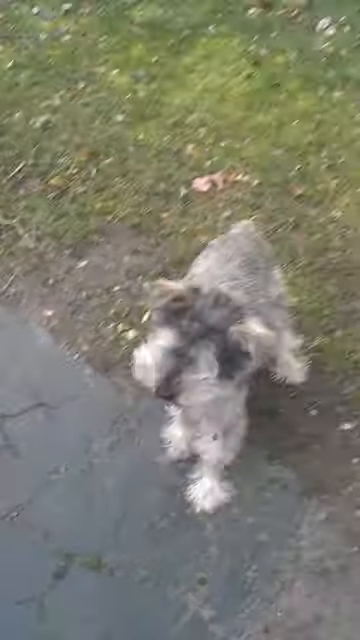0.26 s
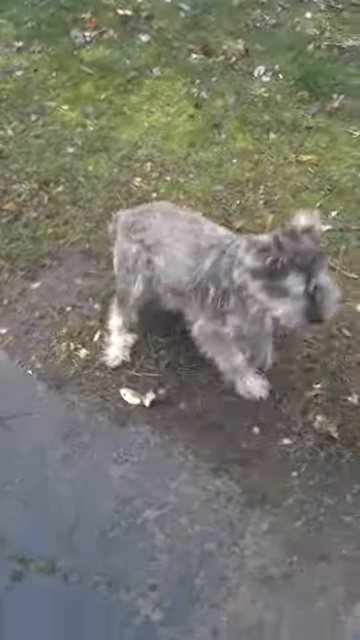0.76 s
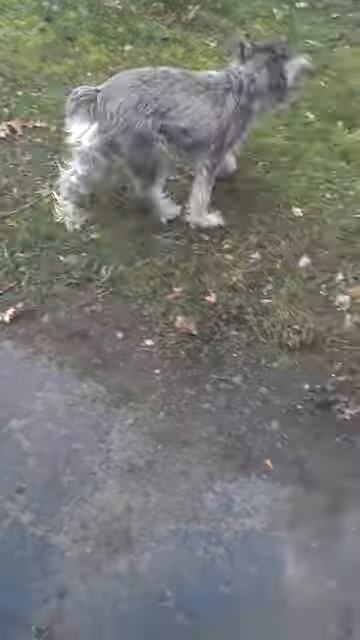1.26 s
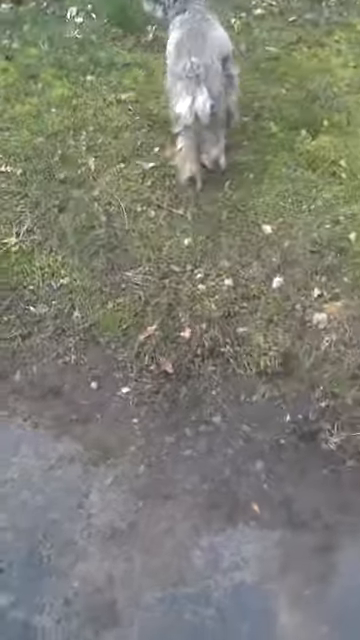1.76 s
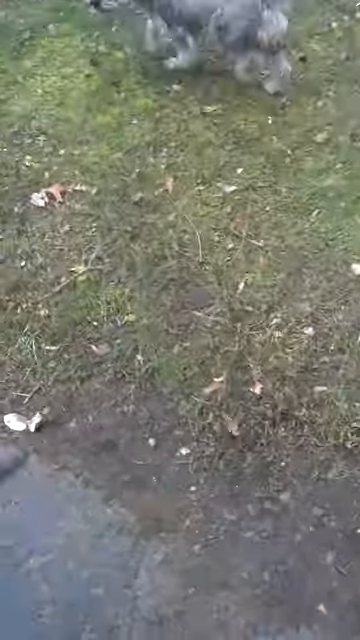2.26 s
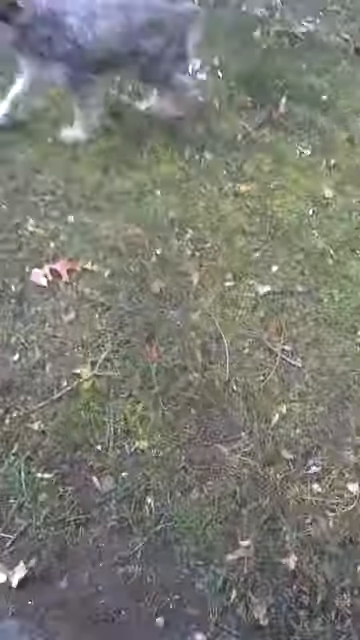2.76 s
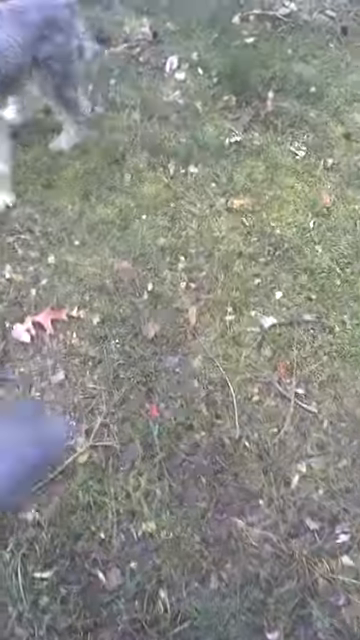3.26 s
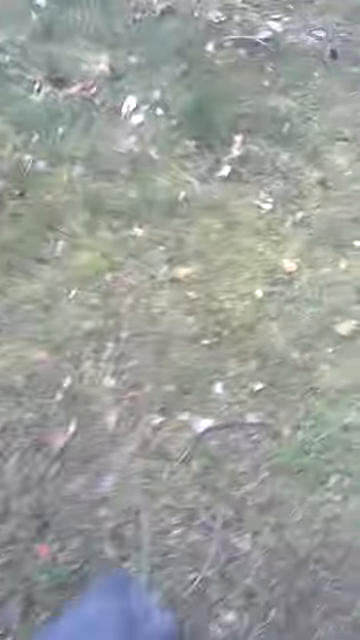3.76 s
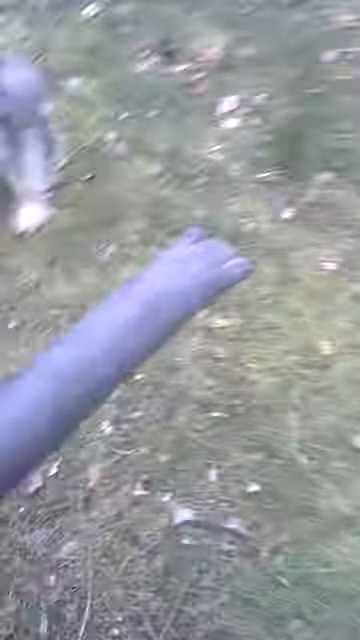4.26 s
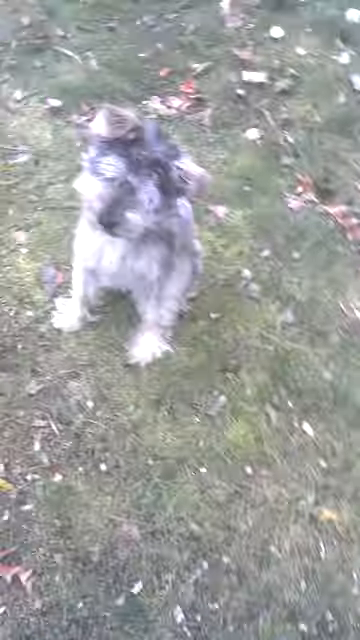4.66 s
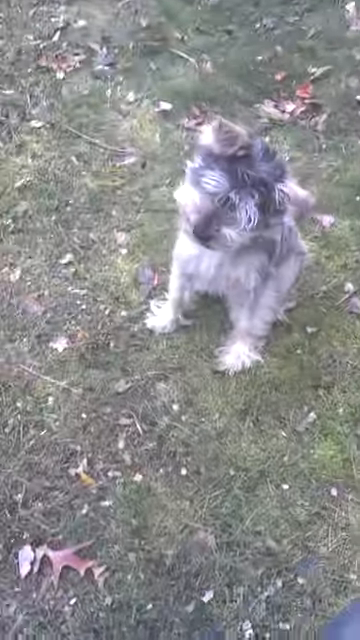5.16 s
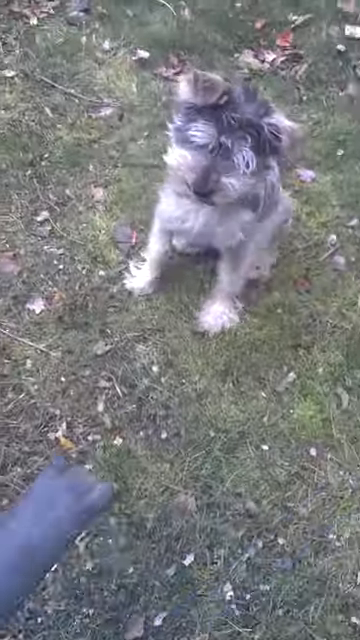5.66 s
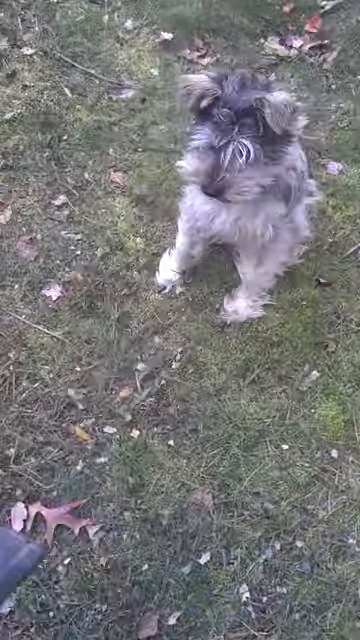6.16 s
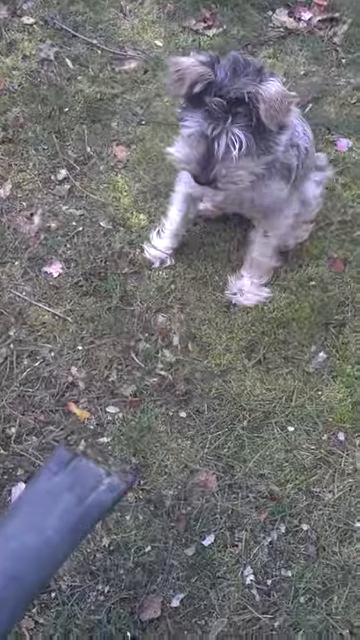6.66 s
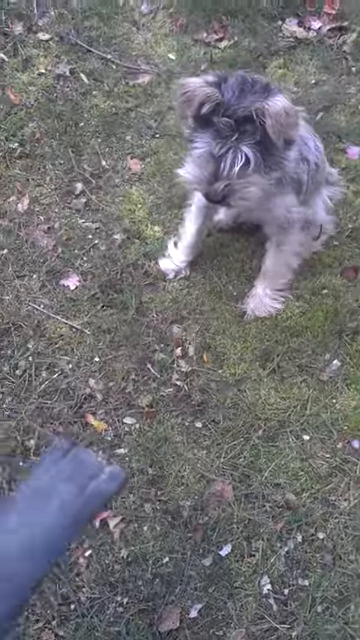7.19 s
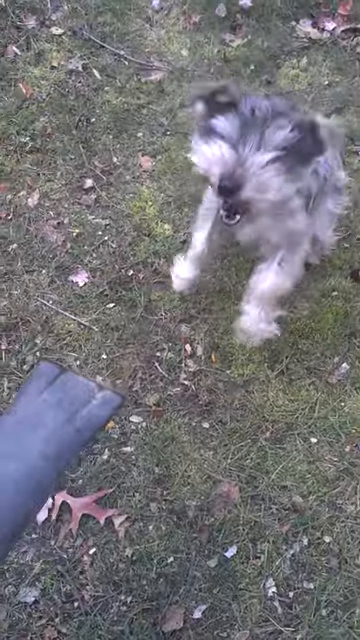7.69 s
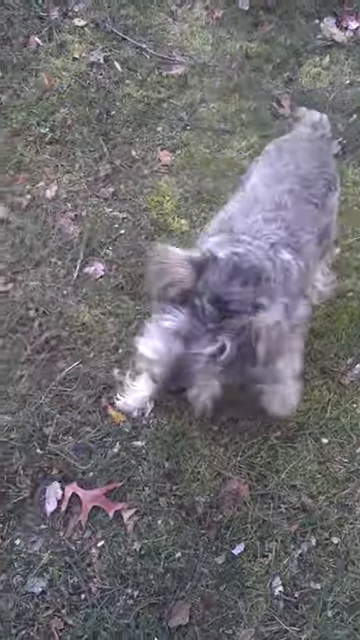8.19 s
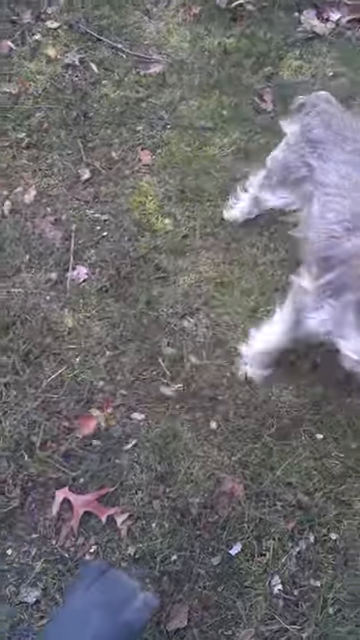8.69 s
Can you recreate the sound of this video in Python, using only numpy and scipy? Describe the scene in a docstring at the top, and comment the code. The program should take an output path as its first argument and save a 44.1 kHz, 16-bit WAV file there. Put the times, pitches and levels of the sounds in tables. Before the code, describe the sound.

Continuous blower noise outdoors, already running at the start and still running at the end. Rushing air with a hollow tube colour dominates, over a faint low motor hum and under shrill fan tones that fade in and out rapidly. Early on a very faint whistling whine slides about; later, irregular low air buffets strike the close stereo phone microphone. The dog makes no audible sound.

```python
"""Over a lawn, a handheld electric leaf blower runs close to a phone with two microphone ports.
A faint whistling whine wanders by in near-sine phrases, and stray air buffets the ports as low noise.
Ten fan blades whine as beating sine multiples over low motor tones; air roars through the tube and
jets out as noise coloured by the tube's resonances.
The phone makes stereo from the ports, each minus a delayed copy of the other."""
import sys
import numpy as np
from scipy import signal
from scipy.fft import rfft, irfft, next_fast_len
from scipy.io import wavfile

SR = 44100
rng = np.random.default_rng(int(sys.argv[2]) if len(sys.argv) > 2 else 0)


def log_audio(samples):
    """Write samples as a 16-bit WAV file to the path given in sys.argv[1]."""
    # one column per channel
    frames = np.atleast_2d(samples).T
    # limit to full scale, then quantise
    limited = np.clip(frames, -1, 1)
    pcm = np.round(limited * 32767).astype(np.int16)
    wavfile.write(sys.argv[1], SR, pcm)


N = 393813
SECONDS = np.arange(N) / SR
SIZE = next_fast_len(N)
HZ = np.maximum(np.arange(SIZE // 2 + 1) * SR / SIZE, 1)   # frequency of each spectrum bin


def from_db(db):
    """Decibels to gain."""
    return 10 ** (np.asarray(db) / 20)


def rms_one(x):
    """Scale to unit rms."""
    return x / np.sqrt(np.mean(x ** 2) + 1e-20)


def in_time(rows):
    """Columns of a table as curves, one value a sample."""
    s, *columns = np.transpose(rows)
    return [np.interp(SECONDS, s, column) for column in columns]


def at_hz(points, hz):
    """Read a table on a log-frequency axis."""
    points = np.array(points)
    return np.interp(np.log(hz), np.log(points[:, 0]), points[:, 1])


def drift(rate_hz):
    """Slow chance movement, spread 1: noise smoothed by two equal poles at the given rate."""
    step = 40   # samples between computed values
    pole = np.exp(-2 * np.pi * rate_hz * step / SR)
    noise = rng.standard_normal(N // step + 2002)
    slow = signal.lfilter([1], [1, -2 * pole, pole ** 2], noise)[2000:]   # drop the settling
    return np.interp(np.arange(N) / step, np.arange(len(slow)), rms_one(slow))


def delay(x, samples):
    """Shift later by whole samples."""
    return np.concatenate([np.zeros(samples), x[:-samples]])


def white():
    """Spectrum of fresh white noise."""
    return rfft(rng.standard_normal(SIZE))


def to_sound(spectrum):
    """Spectrum back to a waveform of scene length."""
    return irfft(spectrum, SIZE)[..., :N]


# Faint whistling whine, one list a phrase. Each row: time in seconds, pitch in Hz, peak amplitude in dB.
WHISTLE_PHRASES = [
    [(.8, 1440, -43), (.92, 1430, -41), (1.0, 1400, -35), (1.05, 1390, -41)],
    [(1.07, 1275, -38), (1.17, 1235, -35), (1.25, 1270, -36), (1.36, 1285, -36), (1.45, 1325, -35),
     (1.54, 1290, -39)],
    [(1.58, 1150, -41), (1.66, 1290, -39), (1.73, 1410, -36), (1.8, 1470, -34), (1.87, 1497, -35),
     (1.96, 1503, -34), (2.05, 1485, -37), (2.1, 1465, -33), (2.15, 1400, -37)],
]


def whistle():
    """A near sine that wanders in short phrases, then arches up and back."""
    tone = 0
    for phrase in WHISTLE_PHRASES:
        hz, db = in_time(phrase)
        start, end = phrase[0][0], phrase[-1][0]
        on = np.clip(np.minimum(SECONDS - start, end - SECONDS) / 0.02, 0, 1)   # 20 ms ramps
        tone = tone + on * from_db(db) * np.sin(2 * np.pi * np.cumsum(hz) / SR)
    return np.array([tone, tone])


# Stray air on the ports, growing as the tube turns in. Each row: time in seconds, level in dB.
BREEZE_LEVEL = [(0, -80), (3.5, -74), (3.7, -41), (4.0, -47), (4.3, -59), (4.7, -54), (4.9, -35),
                (6.0, -45), (6.6, -37), (7.2, -35), (7.8, -36), (8.93, -27)]
# Puffs on top of the breeze. Each row: peak time in seconds, peak level in dB,
# half width in seconds (to 1/e of the power).
PUFFS = [(5.05, -32, 0.11), (5.4, -32.5, 0.067), (6.14, -36, 0.07), (6.4, -38, 0.058), (6.95, -34, .09),
         (7.34, -28.5, 0.046), (7.62, -35, .06), (8.02, -30.5, 0.069), (8.3, -35, .07), (8.52, -28.5, 0.11),
         (8.85, -40, 0.1)]


def buffeting():
    """Level of the stray air in dB: bell-shaped puffs added in power to the breeze."""
    power = from_db(2 * in_time(BREEZE_LEVEL)[0])
    for peak_s, peak_db, half_width_s in PUFFS:
        power = power + from_db(2 * peak_db) * np.exp(-((SECONDS - peak_s) / half_width_s) ** 2)
    return 10 * np.log10(power)


# Colour of the stray air. Each row: frequency in Hz, relative noise density in dB.
WIND_COLOUR = [(20, -30), (40, -4), (80, -1), (130, 0), (250, -12), (450, -21.5), (900, -97)]


def wind():
    """Lumpy low noise, unrelated at the two ports; the stronger it blows, the higher it reaches."""
    level_db, out = buffeting(), np.zeros((2, N))
    upper = 1 / (1 + (220 / HZ) ** 4)   # share of the noise above about 220 Hz
    reach = from_db(1.23 * (level_db + 37.0))
    for port, port_db in enumerate((-1.5, 1.5)):
        noise = white() * from_db(at_hz(WIND_COLOUR, HZ))
        lumps = from_db(port_db + 4.6 * drift(16.0))
        out[port] = lumps * (to_sound(noise * (1 - upper)) + reach * to_sound(noise * upper))
    return from_db(level_db) * rms_one(out)


def beating(rows):
    """Amplitude, rms 1, whose power swings as a cosine from row to row: round crests, sharp dips."""
    s, db = np.transpose(rows)
    row_numbers = np.arange(len(s))
    place = np.interp(SECONDS, s, row_numbers)
    eased = np.floor(place) + np.sin(np.pi / 2 * (place % 1)) ** 2
    power = np.interp(eased, row_numbers, from_db(2 * db))
    return rms_one(np.sqrt(power))


# Blade-pass rate. Each row: time in seconds, rate in Hz.
BLADE_PASS = [(0.0, 2335.5), (0.5, 2335), (0.9, 2341.5), (1.8, 2341.5), (2.6, 2338.5), (7.5, 2341.5),
              (8.93, 2343.5)]
# Blade tones at the ports. Each row: multiple of the blade-pass rate, direct sound's mean level in dB,
# first port over second in dB, first port's lead in radians, second port's phase wander in radians,
# amplitude of each scattered part (in phase and in quadrature) over the direct sound.
BLADE_TONES = [(1, -37, 17, -1, 0.53, 0.17), (2, -38, 19, 2.5, 0.94, .13), (3, -50.5, 18, 0.5, .25, 0.65),
               (4, -60.5, 12, -4, 0.56, 0.45), (5, -72, 12, 0.5, .9, 0.7)]
# Crests and dips of multiples 1 to 4 as the paths to the phone interfere.
# Each row: time in seconds, relative level in dB.
BEATS_1ST = [(0, -36.5), (0.284, -42), (0.379, -54), (0.449, -47), (0.529, -56), (0.614, -42),
             (0.723, -54.0), (0.868, -38), (0.978, -53), (1.107, -37), (1.462, -43), (1.671, -36),
             (1.781, -51), (1.796, -39), (1.846, -56), (1.976, -42), (2.05, -52), (2.115, -40),
             (2.2, -56.0), (2.35, -41), (2.454, -33.5), (2.649, -42), (2.739, -36.5), (3.108, -54),
             (3.278, -36), (3.332, -47.8), (3.697, -35.5), (3.781, -54), (3.851, -39), (3.881, -55.1),
             (4.006, -38), (4.071, -54), (4.26, -36), (4.55, -56), (4.819, -38.5), (4.874, -58),
             (5.05, -32.5), (5.28, -40), (5.423, -34), (5.612, -56), (5.637, -42), (5.722, -43),
             (5.832, -41.5), (6.026, -56), (6.231, -39.5), (6.301, -57), (6.44, -39), (6.535, -47),
             (6.68, -34.5), (7.0, -40), (7.199, -36.5), (7.508, -40), (7.528, -40), (7.638, -51),
             (7.717, -40), (7.852, -61), (7.892, -40), (7.932, -48.8), (7.972, -38), (8.112, -43),
             (8.401, -38), (8.556, -61), (8.62, -46), (8.735, -48), (8.88, -37), (8.93, -41.3)]
BEATS_2ND = [(0.0, -33.7), (0.01, -30.0), (0.06, -34.5), (0.114, -27.0), (0.144, -36.9), (0.166, -27.7),
             (0.237, -39.2), (0.269, -30.6), (0.295, -37.2), (0.475, -48.7), (0.591, -35.3), (0.619, -42.2),
             (0.686, -33.3), (0.8, -44.3), (0.844, -33.3), (0.89, -41.6), (0.96, -34.1), (1.024, -47.4),
             (1.201, -33.3), (1.231, -44.9), (1.273, -30.9), (1.451, -30.6), (1.511, -43.3), (1.604, -28.7),
             (1.758, -45.2), (1.788, -36.4), (1.822, -47.6), (1.866, -32.0), (1.944, -44.2), (2.057, -33.8),
             (2.089, -45.7), (2.121, -32.6), (2.171, -46.7), (2.209, -33.1), (2.251, -41.3), (2.367, -29.8),
             (2.43, -42.2), (2.662, -39.9), (2.694, -34.6), (2.796, -44.5), (2.873, -32.3), (2.921, -39.5),
             (2.943, -30.9), (3.075, -42.4), (3.131, -29.6), (3.173, -39.6), (3.213, -29.9), (3.251, -42.2),
             (3.299, -41.3), (3.322, -26.9), (3.348, -35.5), (3.368, -28.6), (3.39, -35.4), (3.47, -38.5),
             (3.516, -30.1), (3.55, -39.4), (3.64, -32.4), (3.696, -49.5), (3.779, -37.1), (3.893, -42.4),
             (3.931, -33.6), (4.101, -29.7), (4.151, -39.8), (4.19, -40.5), (4.226, -30.1), (4.278, -40.2),
             (4.334, -32.9), (4.368, -41.5), (4.414, -30.1), (4.51, -38.9), (4.781, -36.6), (4.887, -44.2),
             (5.122, -35.5), (5.537, -47.2), (5.607, -33.9), (5.761, -39.4), (5.939, -33.4), (6.002, -37.0),
             (6.18, -27.0), (6.31, -45.9), (6.429, -30.4), (6.539, -45.3), (6.619, -31.2), (6.689, -36.1),
             (6.787, -30.3), (6.99, -34.2), (7.09, -29.8), (7.22, -44.0), (7.289, -33.0), (7.357, -46.7),
             (7.437, -34.9), (7.517, -40.5), (7.561, -29.8), (7.599, -38.4), (7.71, -31.4), (7.776, -40.1),
             (7.91, -34.2), (8.034, -41.1), (8.062, -30.1), (8.128, -43.7), (8.151, -30.9), (8.207, -36.1),
             (8.453, -30.2), (8.499, -42.1), (8.565, -27.0), (8.63, -42.1), (8.67, -28.6), (8.72, -43.8),
             (8.76, -28.0), (8.846, -41.3), (8.902, -34.2), (8.93, -40.5)]
BEATS_3RD = [(0.0, -49), (0.05, -35), (0.27, -38.5), (2.29, -35), (2.51, -57), (2.91, -37.5), (2.96, -44),
             (3.68, -39.5), (5.32, -45), (5.4, -40), (6.39, -40), (6.87, -50), (7.04, -37.5), (7.14, -46.5),
             (8.93, -39.5)]
BEATS_4TH = [(0, -55), (.5, -55), (2.0, -56), (2.9, -45), (3.6, -61), (4.3, -52), (5.3, -54), (6.0, -53),
             (6.6, -61), (7.8, -58), (8.93, -55)]
FLUTTER_HZ = 8.0   # drift rate of the 1st multiple's scattered sound; shorter waves flutter faster
# Low motor tones. Each row: multiple of half the shaft rate, amplitude in dB, waver in dB.
MOTOR_TONES = [(2, -37.5, 2.5), (4, -43, 3)]
# Swell of the motor tones. Each row: time in seconds, relative level in dB.
MOTOR_SWELL = [(0.0, -43), (0.1, -48.5), (3.28, -40), (3.53, -58), (3.58, -44.5), (5.32, -46.5),
               (8.63, -43), (8.93, -35)]


def fan():
    """Blade-pass tone and multiples, fading as paths interfere, and the motor's low tones."""
    blade_phase = 2 * np.pi * np.cumsum(in_time(BLADE_PASS)[0]) / SR
    fades = [beating(rows) for rows in (BEATS_1ST, BEATS_2ND, BEATS_3RD, BEATS_4TH)]
    out = np.zeros((2, N))
    for k, (multiple, gain_db, near_db, lead, wander, scatter) in enumerate(BLADE_TONES):
        fade = fades[min(k, len(fades) - 1)]   # the 5th multiple fades with the 4th
        rate_hz = FLUTTER_HZ * multiple
        # direct plus scattered sound: short deep dips
        paths = 1 + scatter * (drift(rate_hz) + 1j * drift(rate_hz))
        level = np.sqrt(2) * np.abs(paths) * from_db(gain_db) * fade
        phase = multiple * blade_phase + np.angle(paths)
        out[0] += level * from_db(near_db / 2) * np.sin(phase + lead)
        # the path to the shaded port wanders as the hands move
        shaded = from_db(1.0 * drift(20) - near_db / 2)
        out[1] += level * shaded * np.sin(phase + wander * drift(2.5))
    swell = rms_one(from_db(in_time(MOTOR_SWELL)[0]))
    half_shaft_phase = blade_phase / 20   # ten blades a turn
    port_lag = np.array([[.1], [0]])   # rad
    for multiple, db, waver_db in MOTOR_TONES:
        level = swell * from_db(db + waver_db * drift(2))
        out += level * np.sin(multiple * half_shaft_phase - port_lag)
    return out


# The air stream as the tube swings about; each level acts as a departure from its own mean.
# Each row: time in seconds, roar in dB, jet hiss in dB, treble in dB,
# bands of the 1st and 2nd tube resonance over the roar, both in dB.
AIR_SWINGS = [(0.0, -27, -31, -38, 1, -2.5), (0.07, -23, -30.5, -36, -6, -7), (0.22, -25, -34, -40, -7, -7),
              (0.69, -23, -40.5, -37, -10, -5), (0.77, -23, -32.5, -38, -8.5, -3),
              (1.0, -20.5, -37, -34.5, -12.5, -6), (1.15, -21.5, -30.5, -40, -11.5, -7),
              (1.27, -19.5, -32.5, -35.5, -13.5, -10), (1.4, -23.5, -32.5, -35.5, -6, -7.5),
              (1.9, -22, -35, -37.5, -9, -10), (2.34, -22.5, -32.5, -39, -7, -5),
              (2.46, -21, -34, -38.5, -6, -10), (3.28, -23, -33, -33.5, -8, -8),
              (3.48, -23, -32, -40, -4.5, -5.5), (3.72, -24, -34.5, -37, -4.5, -7.5),
              (3.9, -21.5, -32, -35.5, -5.5, -6), (4.23, -20.5, -32, -35, -9.5, -22),
              (4.3, -19, -30, -35.5, -9, -10), (4.4, -22, -31, -41, -9, -8),
              (4.58, -20.5, -33, -41, -10.5, -6), (4.95, -19.5, -32, -36.5, -12.5, -5),
              (5.2, -22, -33, -41.5, -6, -8), (5.4, -22.5, -33.5, -41, -7, -8.5),
              (5.7, -21.5, -34, -37.5, -7.5, -6.5), (6.12, -21, -33, -37.5, -11, -4),
              (6.77, -21.5, -33.5, -40, -8, -6.5), (7.3, -22, -33.5, -38.5, -7, -4.5),
              (7.8, -21.5, -34, -36.5, -6, -8.5), (8.4, -23, -31.5, -38.5, -8.5, -2.5),
              (8.5, -24, -34, -39, -10, -9), (8.93, -21, -31, -44, -9, -8)]
# Colour of the air noise at a port. Each row: frequency in Hz, relative noise density in dB.
STREAM_COLOUR = [(40, -32), (70, -26), (130, -11), (200, -9.5), (300, -6), (450, -10), (900, -10.5),
                 (1200, -8), (1700, -14.5), (2300, -14.5), (3500, -19), (5000, -20.5), (8000, -27.5),
                 (15500, -45.5)]
# How the ports share the air noise: long waves reach both alike. Each row: frequency in Hz,
# first port over second in dB, likeness from 0 to 1, first port's lead in radians.
PORT_LIKENESS = [(70, .6, .87, .16), (130, 1.1, .966, .29), (200, 1.4, .992, .1), (300, 1.8, .988, -.1),
                 (450, 2.0, .976, -.38), (680, 1.4, .95, -.59), (900, .9, .84, -.75), (1150, .4, .69, -1.2),
                 (1600, 1.9, .35, -1.2), (2100, 5.0, .37, -1.1), (3200, 5.2, .1, -1.1),
                 (14600, 3.0, .05, -1.1)]
# Tube resonances. Each row: centre in Hz, full width in Hz at half amplitude, gain over the stream in dB.
TUBE_RESONANCES = [(434, 124, 4), (668, 74, 3.5), (1298, 27, -6.5), (1746, 174, -4)]
# Each resonance rises or falls by its own share of the two resonance bands.
# Each row: dB per dB of the 1st band, dB per dB of the 2nd band.
RESONANCE_FOLLOWS = [(1.26, -0.43), (0.29, 1.5), (-0.55, -0.38), (1.3, 0.3)]
TUBE_SWAY_DB, TUBE_WANDER = 1.4, .35   # slow random sway of level; of centre, in half widths


def port_noise():
    """Spectra of air noise at the ports: long waves shared, short ones unrelated."""
    table = np.array(PORT_LIKENESS)
    near_db, alike, lead = (at_hz(table[:, [0, column]], HZ) for column in range(1, 4))
    near = from_db(near_db / 2)
    shared, own = np.sqrt(alike) * white(), np.sqrt(1 - alike)
    first = (shared * np.exp(1j * lead) + own * white()) * near
    second = (shared + own * white()) / near
    return from_db(at_hz(STREAM_COLOUR, HZ)) * np.array([first, second])


def air():
    """Turbulence flickering band by band, coloured by tube resonances that sway and slide."""
    departures = np.array([curve - np.mean(curve) for curve in in_time(AIR_SWINGS)])
    swings, standing_out = departures[:3], departures[3:]
    ports, gust, centres = port_noise(), drift(24), np.geomspace(150, 15000, 12)
    out = 0
    for k, hz in enumerate(centres):
        band = np.interp(np.log(HZ), np.log(centres), np.arange(12) == k)
        # blend of roar, jet hiss and treble in this band
        weights = [np.interp(np.log(hz), np.log([1500, 3400, 9000]), np.arange(3) == j) for j in range(3)]
        own_flicker_db = np.interp(np.log(hz), np.log([500, 4000, 14000]), [1.4, .9, 2.2])
        flicker_db = .5 * gust + own_flicker_db * drift(12)
        out = out + from_db(np.dot(weights, swings) + flicker_db) * to_sound(ports * band)
    for (hz, width_hz, db), follows in zip(TUBE_RESONANCES, RESONANCE_FOLLOWS):
        off = 2 * (HZ - hz) / width_hz   # distance from the centre in half widths
        peak = 1 / (1 + off ** 2)
        sway_db = TUBE_SWAY_DB * drift(0.39) + 1.27 * drift(7.0)
        gain = from_db(db + swings[0] + np.dot(follows, standing_out) + sway_db)
        out = out + gain * to_sound(ports * peak)
        # the slope of the peak, added or taken away, slides its centre up or down
        slope = 2 * off * peak ** 2
        out = out + gain * TUBE_WANDER * drift(1.7) * to_sound(ports * slope)
    return from_db(-22.0) * rms_one(out)


def scene():
    """Sound at the two microphone ports."""
    return whistle() + wind() + fan() + air()


# Hiss unrelated in left and right. Each row: frequency in Hz, gain on white noise in dB.
CHANNEL_HISS = [(30, -43), (1000, -95), (3000, -33.5), (6000, -30), (10000, -37.5), (15500, -51.5)]
STEER_SAMPLES, CROSS_DB = 16, -.5   # delay and gain of the subtracted copy
RIGHT_DB = 2.6   # right channel's gain over left
LOW_CUT_HZ, CUTOFF_HZ = 95, 15750


def record(dry):
    """Delay and subtract aims one channel to each side; bottom cut, a little hiss, top cut."""
    low_cut = signal.butter(2, LOW_CUT_HZ, "high", fs=SR, output="sos")
    top_cut = signal.ellip(14, .3, 80, CUTOFF_HZ, fs=SR, output="sos")
    first, second = signal.sosfilt(low_cut, dry)
    left = first - from_db(CROSS_DB) * delay(second, STEER_SAMPLES)
    right = second - from_db(CROSS_DB) * delay(first, STEER_SAMPLES)
    hiss = [to_sound(white() * from_db(at_hz(CHANNEL_HISS, HZ))) for side in range(2)]
    balance = from_db([[-RIGHT_DB / 2], [RIGHT_DB / 2]])
    pair = (np.array([left, right]) + hiss) * balance
    return signal.sosfilt(top_cut, pair)


dry = scene()
out = record(dry)
log_audio(out)
```